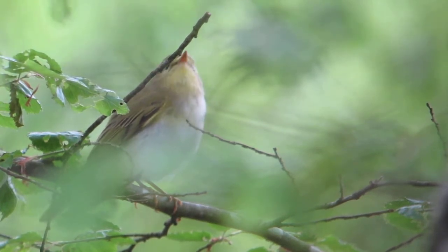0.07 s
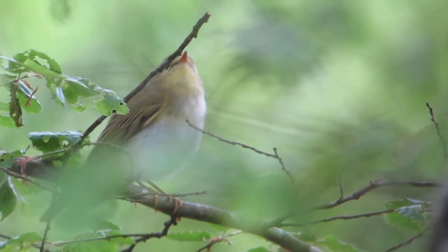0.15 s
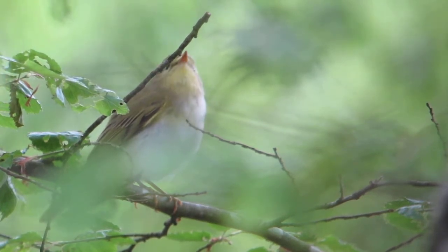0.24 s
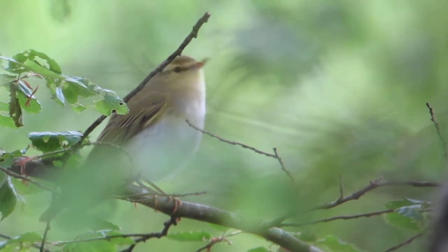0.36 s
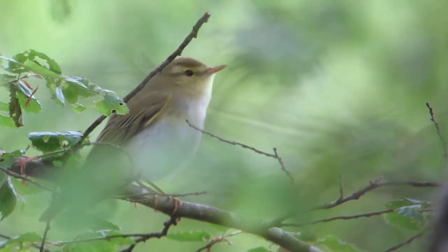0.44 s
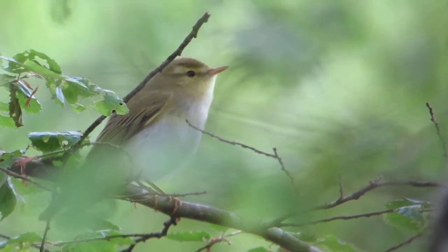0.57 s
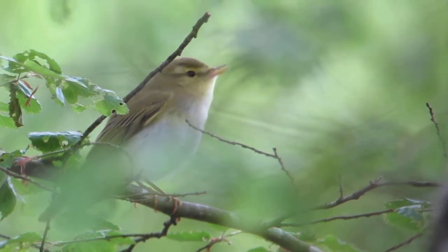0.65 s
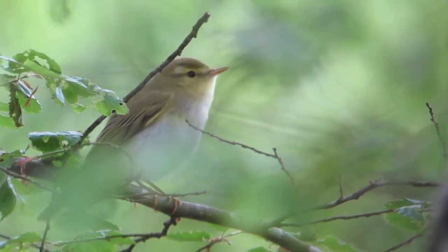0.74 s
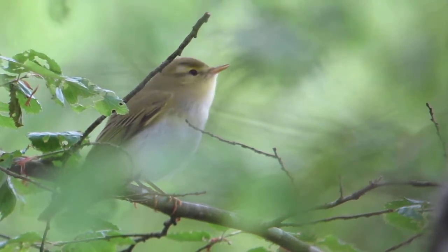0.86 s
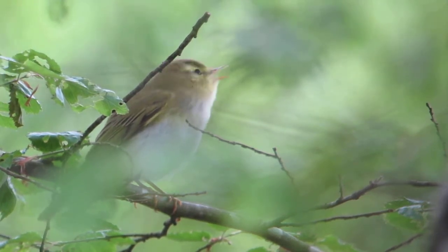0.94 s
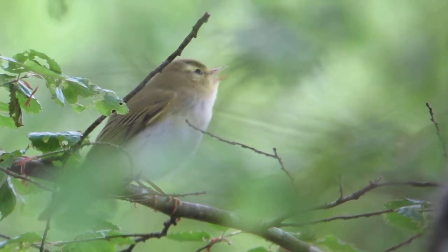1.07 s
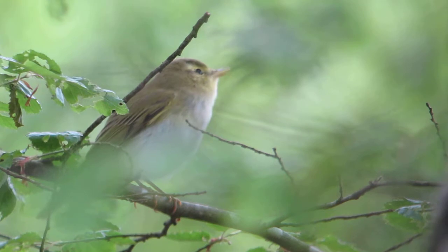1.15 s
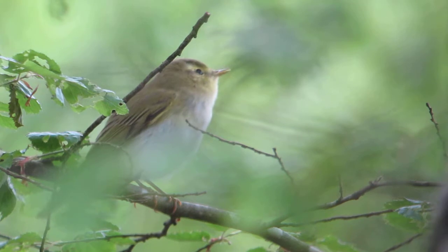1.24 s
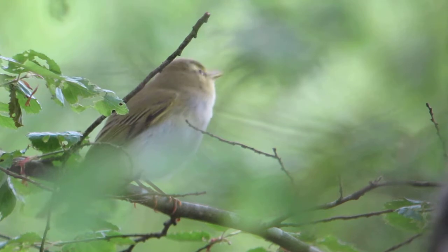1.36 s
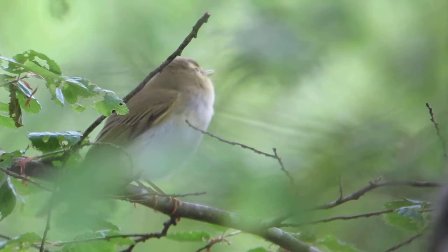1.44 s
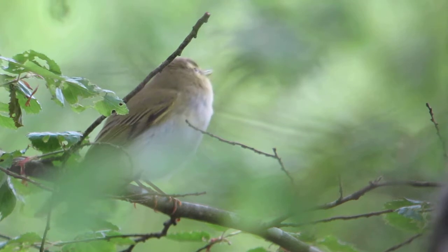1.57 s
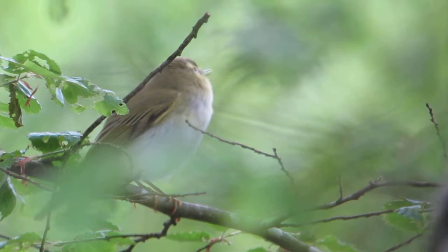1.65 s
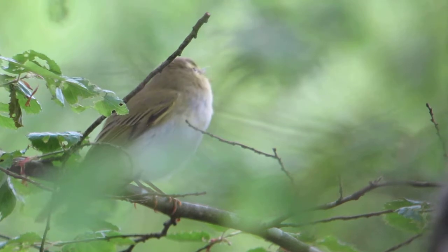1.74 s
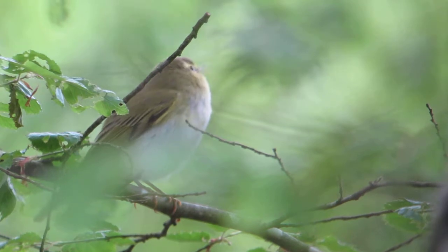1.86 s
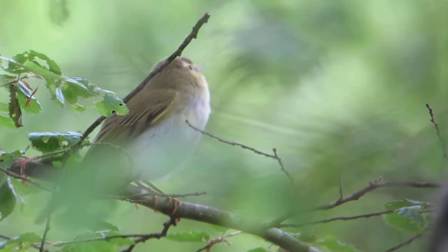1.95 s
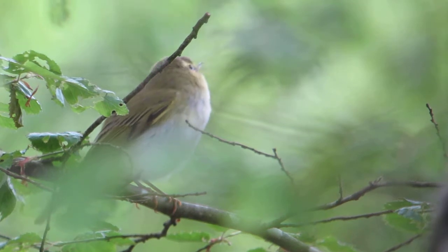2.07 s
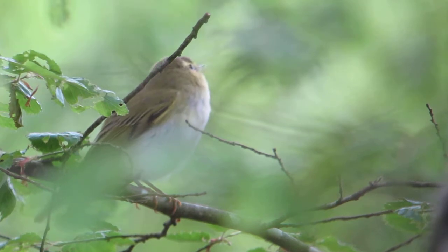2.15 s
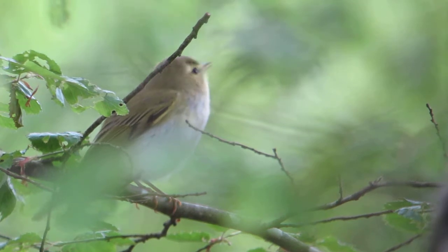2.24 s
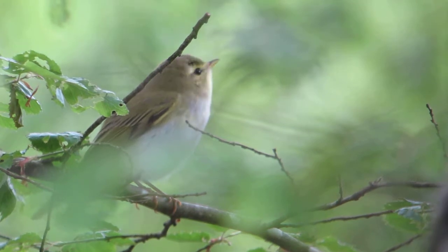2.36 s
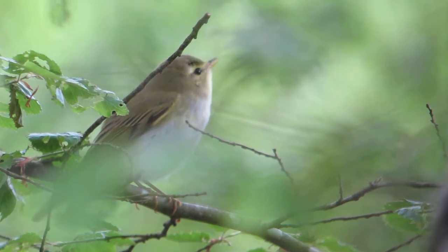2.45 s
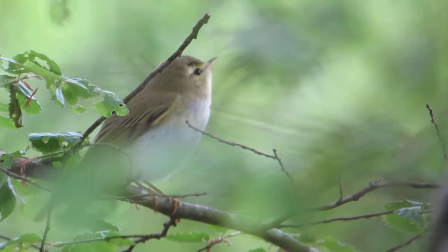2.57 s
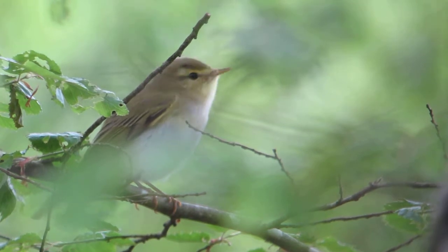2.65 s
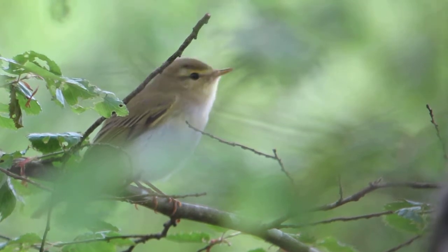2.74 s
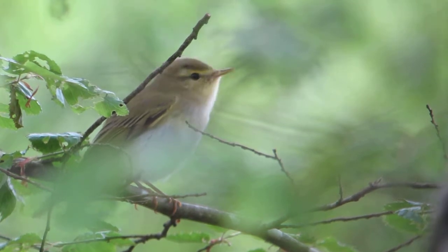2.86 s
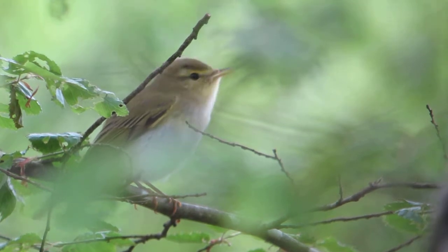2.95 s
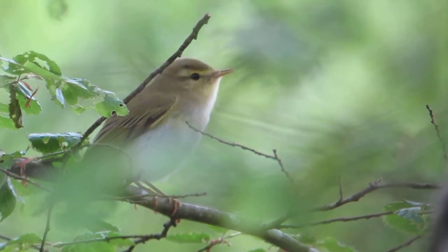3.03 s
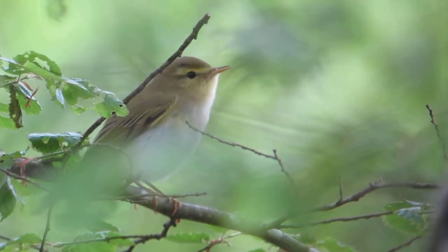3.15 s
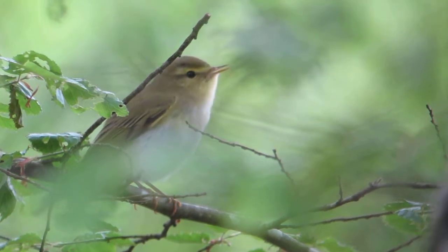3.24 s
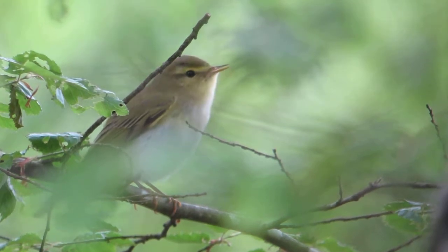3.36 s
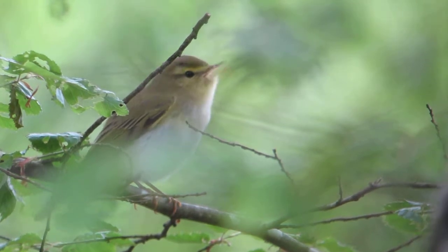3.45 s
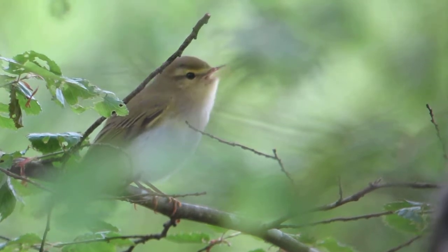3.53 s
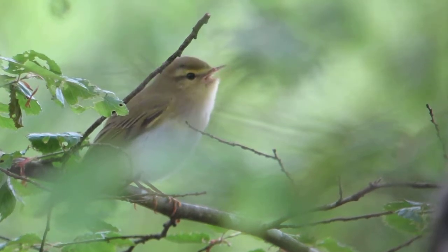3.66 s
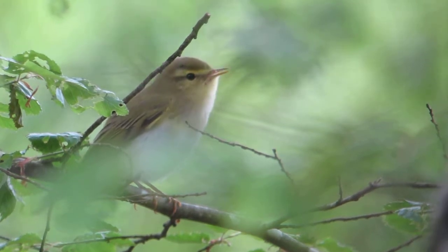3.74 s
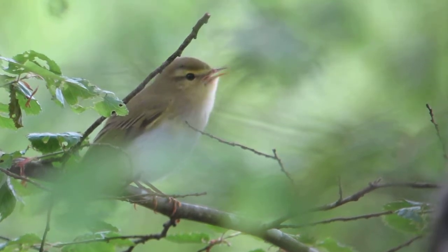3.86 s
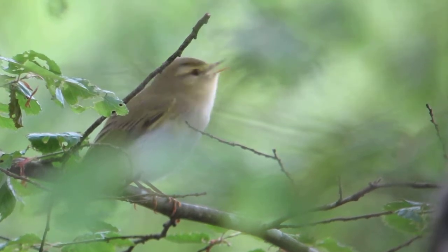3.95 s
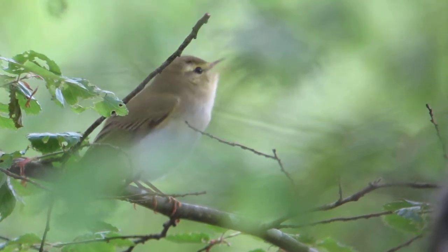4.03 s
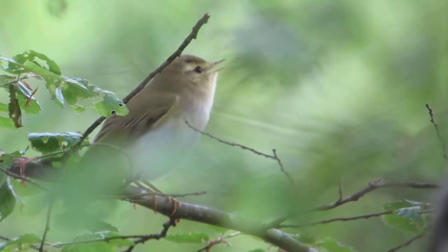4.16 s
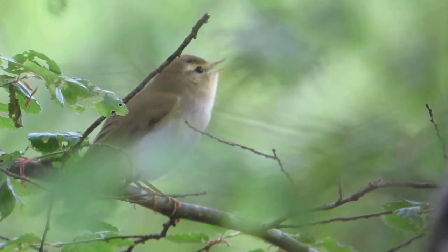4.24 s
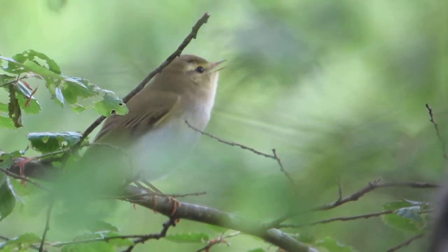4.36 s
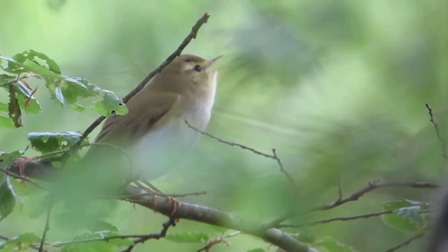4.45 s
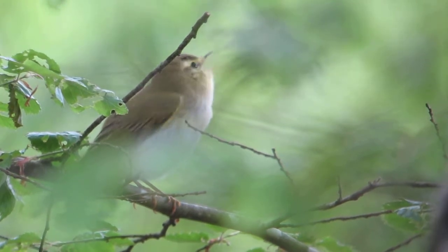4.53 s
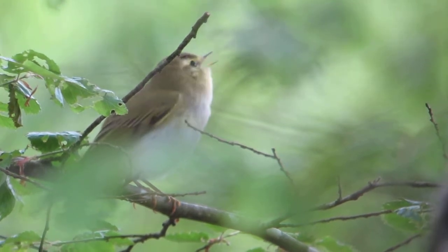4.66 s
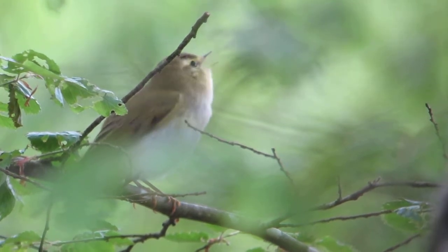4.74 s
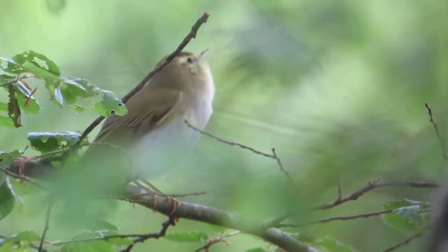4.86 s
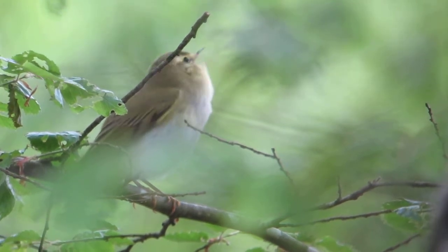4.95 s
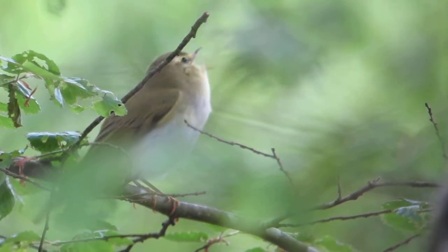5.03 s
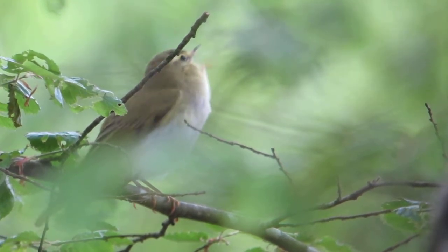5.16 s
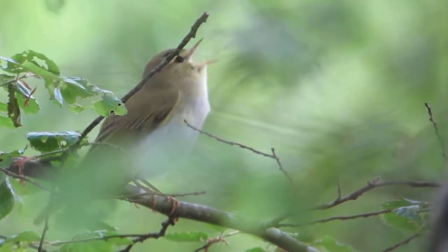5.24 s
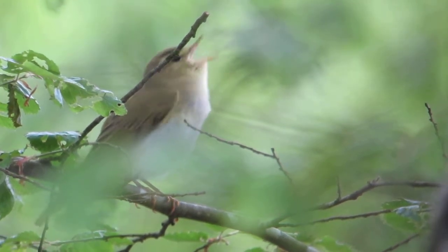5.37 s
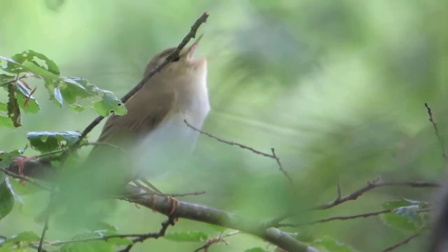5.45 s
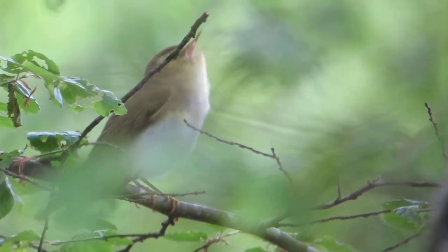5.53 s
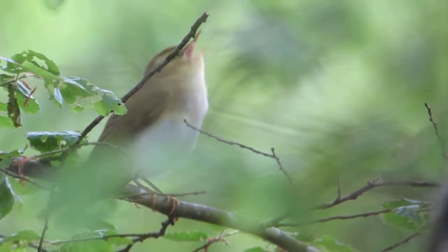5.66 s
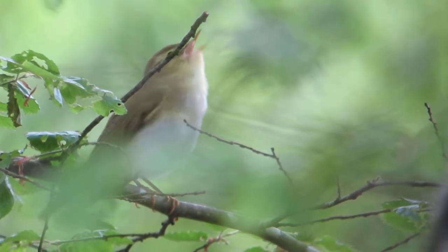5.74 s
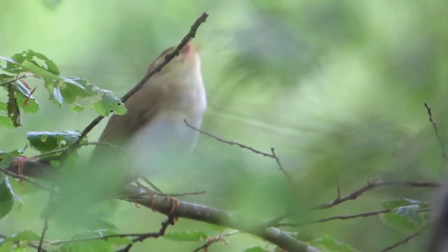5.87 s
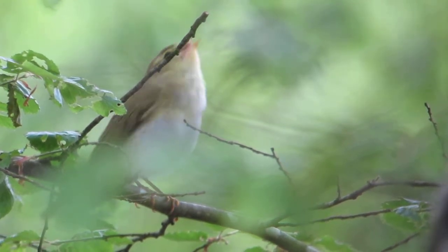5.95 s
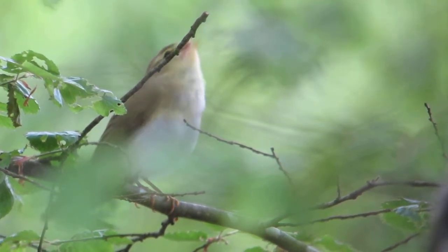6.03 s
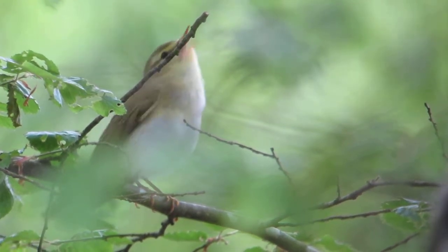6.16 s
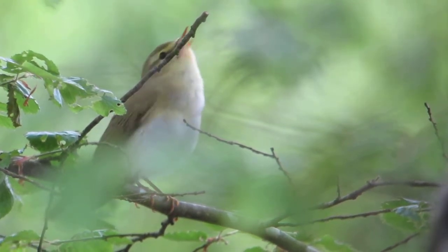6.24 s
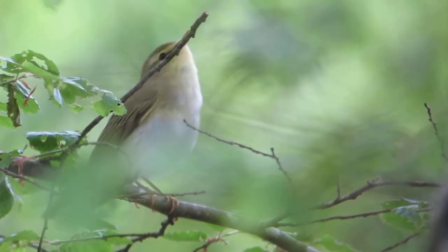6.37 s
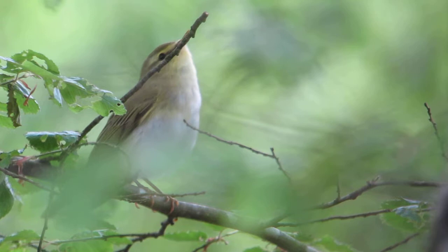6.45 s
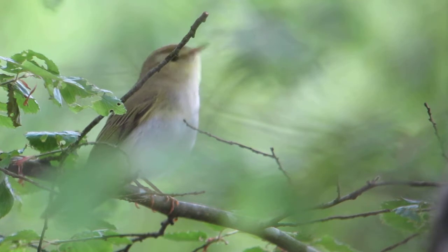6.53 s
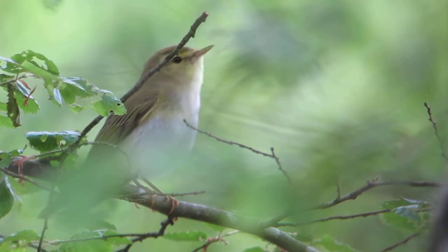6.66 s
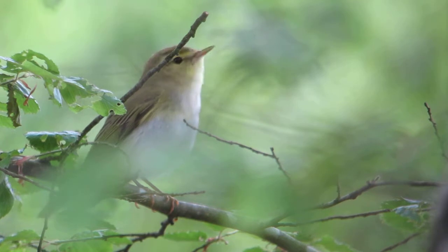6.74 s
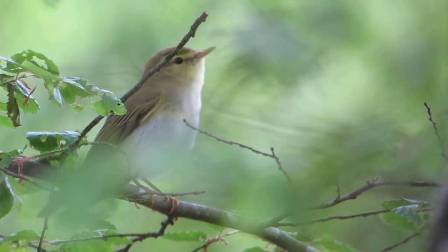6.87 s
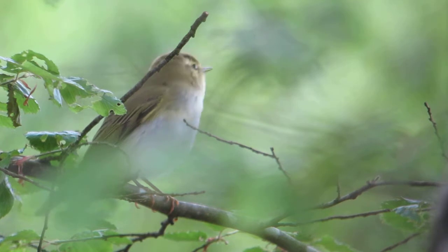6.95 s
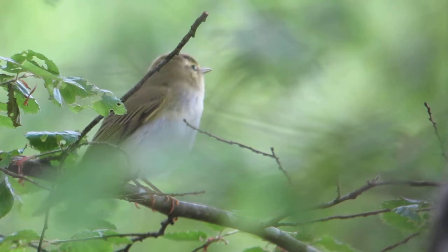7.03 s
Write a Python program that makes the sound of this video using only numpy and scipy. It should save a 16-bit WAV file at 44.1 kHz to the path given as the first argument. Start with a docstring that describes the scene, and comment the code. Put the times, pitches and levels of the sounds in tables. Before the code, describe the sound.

A small warbler sings close to a stereo microphone in a leafy wood, over soft steady air and a thin, faint high whine. At about 0.7 seconds it begins quiet, high ticks, roughly eight a second, which gradually swell. Around 3.5 seconds they become fuller, sharper notes, each sweeping upward, coming slightly faster. At 5 seconds they run into a rapid trill, the loudest sound, peaking near 6 seconds and ending at about 6.3 with a short ring among the trees.

Farther off, a bird slightly to the left whistles three falling pairs between 1.6 and 3.3 seconds. Another gives soft falling slurs from 3.5 to 5.2 seconds. A faint low rumble rises a little around 4 seconds. A few distant raspy chirps and tiny clicks are scattered through. From 6.4 to 7 seconds a faint, even run of falling notes comes from deep in the wood.

```python
"""A wood warbler close to a stereo microphone in a leafy wood: soft ticks grow into 'sip' notes and run
into a fast, loud trill, each note an upward sweep of the syrinx thrown back by trunks and leaves.
A few trees away a second bird slurs; farther off one whistles three falling pairs and others chirp.
Under it lie woodland air, a low rumble, a few hissy far-off calls, tiny clicks and a thin whine."""
import sys
import numpy as np
from scipy import signal
from scipy.fft import rfft, irfft
from scipy.io import wavfile
from scipy.ndimage import uniform_filter1d

SR = 44100
rng = np.random.default_rng(int(sys.argv[2]) if len(sys.argv) > 2 else 0)


def transcribe(signal):
    """Save signal, clipped to [-1, 1], as a 16-bit WAV file at the path in sys.argv[1]."""
    frames = np.atleast_2d(signal).T
    limited = np.clip(frames, -1, 1)
    pcm = np.round(limited * 32767).astype(np.int16)
    wavfile.write(sys.argv[1], SR, pcm)


N = 313110


def amp(db):
    """Decibels to gain."""
    return 10 ** (np.asarray(db) / 20)


def unit(x):
    """Scales to rms 1."""
    return x / np.sqrt(np.mean(x ** 2) + 1e-20)


def read(points, hz):
    """Reads a spectrum on a log-frequency axis."""
    f, value = np.transpose(points)
    return np.interp(np.log(hz + 1), np.log(f + 1), value)


def follow(rows, s):
    """Reads every column of a curve at the times s."""
    times, *columns = np.transpose(rows)
    return [np.interp(s, times, c) for c in columns]


def add(mix, s, sound):
    """Mixes a sound in at time s."""
    part = mix[..., max(round(s * SR), 0):][..., :sound.shape[-1]]
    part += sound[..., :part.shape[-1]]


def noise(gain, likeness):
    """Stereo noise of rms 1 with the given spectral shape and left-right likeness."""
    a, b = rfft(rng.standard_normal((2, N)))
    same = np.clip(likeness, -1, 1)
    return unit(irfft(np.array([a, same * a + np.sqrt(1 - same ** 2) * b]) * gain, N))


def wander(size, seconds):
    """A random drift of about unit size that changes over the given time."""
    knots = rng.standard_normal(512)
    return np.interp(np.arange(size) / SR / seconds, np.arange(len(knots)), knots)


def phase_of(hz):
    """Phase of a gliding tone."""
    return 2 * np.pi * np.cumsum(hz) / SR


def slur(db, first_hz, last_hz, length_s, waver=0.012):
    """A short, slightly unsteady glide."""
    size = int(length_s * SR)
    pitch = np.linspace(first_hz, last_hz, size) * (1 + waver * wander(size, 0.00367))
    return amp(db) * np.sin(phase_of(pitch)) * signal.windows.tukey(size, .6)


def woodland_air(level_db=-52.5):
    """The bed of the place: a wide, nearly steady wash of air."""
    # colour of the air: (frequency [Hz], relative density [dB])
    spectrum = [(20, -6.5), (45, -3.5), (70, -2), (120, -1.5), (180, 0.5), (300, -2.5), (600, -2.5),
                (1000, -5), (1600, -8.5), (2100, -6), (3100, -6.5), (3900, -11.5), (6500, -18.5),
                (15500, -22.5)]
    # how alike the two channels are: (frequency [Hz], correlation [0..1])
    likeness = [(30, 0.55), (90, 0.59), (180, 0.48), (400, 0.43), (1500, 0.27), (5000, 0.019),
                (15000, 0.35)]
    hz = np.fft.rfftfreq(N, 1 / SR)
    return amp(level_db + 0.3 * wander(N, 0.352)) * noise(amp(read(spectrum, hz)), read(likeness, hz))


def rumble(up_s=3.45, rise_s=0.68, before_db=-69, after_db=-60, centre_hz=66, width_hz=15):
    """A low, uneven rumble in the middle of the stereo image that steps up once."""
    hz = np.fft.rfftfreq(N, 1 / SR)
    level_db = np.interp(np.arange(N) / SR, [up_s, up_s + rise_s], [before_db, after_db])
    band = np.exp(-.5 * ((hz - centre_hz) / width_hz) ** 2)
    return amp(level_db + 1.1 * wander(N, 0.11)) * noise(band, likeness=0.96)


def whine(level_db=-50.5):
    """A thin steady band of noise near 5 kHz, with three fainter narrow lines."""
    # shape of the band: (frequency [Hz], relative density [dB])
    spectrum = [(4100, -69), (4400, -13.5), (4600, 2.5), (4780, -1), (4920, 6.5), (5080, -4), (5300, -13),
                (5800, -20)]
    # narrow lines: (centre [Hz], half-width [Hz], level [dB])
    lines = [(4770, 31, -63), (8820, 34, -70.5), (12500, 120, -75.5)]
    hz = np.fft.rfftfreq(N, 1 / SR)
    band = amp(read(spectrum, hz)) * (abs(hz - 5000) < 1000)
    out = amp(level_db) * noise(band, likeness=0.033)
    for centre_hz, width_hz, db in lines:
        out += amp(db) * noise(1 / (1 + ((hz - centre_hz) / width_hz) ** 4), likeness=0.15)
    return out


def far_calls_and_clicks():
    """Soft hissy bursts of far-off bird calls, one brief high hiss and tiny dry clicks, all band noise."""
    # far-off calls and the high hiss: (time [s], level [dB], centre [Hz], width [octaves], length [s])
    calls = [(.62, -49.5, 2560, 0.44, 0.065), (.935, -49.5, 1900, 0.72, 0.036), (.94, -53, 5400, .2, .035),
             (1.39, -49, 2840, 0.54, 0.063), (2.67, -49.5, 2520, 0.64, 0.028),
             (3.065, -54, 11700, 0.2, 0.057), (6.74, -50.5, 2450, 0.37, 0.076)]
    # clicks: (time [s], level [dB], centre [Hz], width [octaves], length [s])
    clicks = [(.698, -54, 12500, .3, 0.0043), (1.695, -47, 12100, .3, .005),
              (6.941, -48, 9900, 0.64, 0.0042)]
    out = np.zeros((2, N))
    hz = np.fft.rfftfreq(SR, 1 / SR) + 1
    for s, db, centre_hz, octaves, length_s in calls + clicks:
        band = np.exp(-.5 * (np.log2(hz / centre_hz) / octaves) ** 2)
        burst = unit(irfft(rfft(rng.standard_normal((2, SR))) * band))[:, :int(length_s * SR)]
        add(out, s, amp(db) * burst * signal.windows.tukey(burst.shape[1], .7))
    return out


def foliage(song, near_db, far_db, near_t60_s=0.069, near_rise_s=.007, far_rise_s=0.012):
    """Scatter from the leaves close by dies fast; the deeper wood rings on."""
    # ring of the deeper wood: (frequency [Hz], time to fall 60 dB [s])
    decay = [(2000, 0.74), (4500, 0.6), (6000, 0.43), (7500, 0.5), (14000, 0.45)]
    # the beak beams its sound, so it reaches the trees unevenly: (frequency [Hz], gain [dB])
    scatter = [(2500, -2), (4500, 0), (6200, 6.5), (7400, 0), (9000, 3.5), (14000, 5.5)]
    hz, frame_s, spectra = signal.stft(rng.standard_normal((2, SR)), SR, nperseg=256)
    fade = amp(-60 * frame_s / read(decay, hz)[:, None])
    deep = signal.istft(spectra * fade, SR, nperseg=256)[1][:, :SR]
    t = np.arange(SR) / SR
    deep = unit(deep * (1 - np.exp(-t / far_rise_s)))
    leaves = rng.standard_normal((2, SR)) * (rng.random((2, SR)) < 2000 / SR)  # 2000 echoes a second
    near = unit(leaves * amp(-60 * t / near_t60_s) * (1 - np.exp(-t / near_rise_s)))
    tail = (amp(near_db) * near + amp(far_db) * deep) / np.sqrt(SR)
    spread = irfft(rfft(song) * amp(read(scatter, np.fft.rfftfreq(N, 1 / SR))), N)
    return signal.fftconvolve(spread[None], tail, axes=1)[:, :N]


def far_birds(chip_db=-1, run_start_s=6.42, run_step_s=.0815, run_notes=8):
    """A few raspy chips and one even run of falling notes from deep in the wood."""
    # thin chips: (time [s], relative level [dB])
    chips = [(.631, -57), (1.391, -55), (2.653, -55)]
    # a chip's two parts: (delay [s], relative level [dB], first pitch [Hz], last pitch [Hz], length [s])
    parts = [(0, 1, 5470, 5360, 0.025), (.017, 1, 3290, 2870, 0.0284)]
    song = np.zeros(N)
    for s, db in chips:
        for delay, *part in parts:
            add(song, s + delay, amp(db + chip_db) * slur(*part, waver=0.021))
    for k in range(run_notes):
        falling = slur(db=-59, first_hz=3400, last_hz=2650, length_s=.03, waver=.05)
        add(song, run_start_s + k * run_step_s, falling)
    return song


def whistler(droop_delay_s=.088, droop_db=-2.5, droop_fall=0.077):
    """A far bird's paired whistles, nearly pure tones; the first of each pair droops away."""
    # one whistle, a quick drop to a held pitch: (time [s], pitch [x held pitch], relative level [dB])
    shape = [(0, 1.42, -19), (.011, 1.29, -4.5), (.026, 1.07, 2), (.035, 1.005, 2), (0.061, 1, 1),
             (.084, 1, 4.5), (0.099, 0.9, -25)]
    # pairs: (time [s], delay of the second [s], level [dB], first pitch [Hz], second pitch [Hz])
    pairs = [(1.582, .21, -47.5, 2598, 2455), (2.186, .224, -47, 2460, 2440),
             (2.903, .241, -47.5, 2417, 2410)]
    song = np.zeros(N)
    t = np.arange(0, shape[-1][0], 1 / SR)
    factor, swell_db = follow(shape, t)
    for start, gap, db, first_hz, second_hz in pairs:
        for s, hz in (start, first_hz), (start + gap, second_hz):
            pitch = hz * factor * (1 + 0.0029 * wander(len(t), 0.014))
            call = amp(db + swell_db) * np.sin(phase_of(pitch)) * signal.windows.tukey(len(t), .1)
            add(song, s, call)
        droop = slur(db + droop_db, first_hz, first_hz * (1 - droop_fall), length_s=0.067)
        add(song, start + droop_delay_s, droop)
    return song


def neighbour(fall=.25):
    """A second bird's soft falling slurs, a few trees away."""
    # slurs: (time [s], level [dB], first pitch [Hz])
    slurs = [(3.505, -56, 3700), (3.634, -56, 3550), (3.759, -57, 3700), (3.9, -54, 3600),
             (4.123, -57, 2975), (4.415, -51, 3000), (4.565, -56, 3100), (4.639, -55, 3200),
             (4.731, -53, 3150), (4.818, -52.5, 3150), (4.898, -51.5, 3140), (5.157, -54, 2950)]
    song = np.zeros(N)
    for s, db, hz in slurs:
        add(song, s, slur(db, hz, hz * (1 - fall), length_s=.033))
    return song


def perch(song, left_lag_s=.000023):
    """The straight path from beak to microphone, and single echoes off the nearest trunks."""
    # the head turns while singing: (time [s], left minus right [dB])
    facing = [(.5, -1), (3, -1.5), (4.8, -0.5), (5.2, 0.5), (5.7, 3), (6.3, 4)]
    # echoes off trunks and boughs: (delay [s], left gain [dB], right gain [dB])
    trunks = [(.0062, -12, -13), (.0105, -14, -12.5), (.0135, -17, -17), (.029, -16, -17)]
    lean_db, = follow(facing, np.arange(N) / SR)
    left = irfft(rfft(song) * np.exp(-2j * np.pi * np.fft.rfftfreq(N, 1 / SR) * left_lag_s), N)
    out = np.array([left, song]) * amp(np.array([lean_db, -lean_db]) / 2)
    for delay, *gains_db in trunks:
        for channel, db in zip(out, gains_db):
            add(channel, delay + rng.uniform(-.0001, .0001), amp(db) * song)
    return out


def high_pip(form, db, length_s=0.025):
    """A faint high pip with each tick and sip, sinking from about 11 to 8.5 kHz: (delay, sound)."""
    # from tick to sip: (blend [0..1], pitch [Hz], scoop [share of pitch], delay [s])
    ends = [(0, 11200, -0.36, .003), (1, 8470, 0.145, .012)]
    hz, scoop, delay = follow(ends, form ** 2.2)  # the pip changes later than the note
    t = np.arange(0, length_s, 1 / SR)
    glide = 1 + scoop * np.exp(-t / 0.00475) + 0.024 * wander(len(t), 0.00177)
    return delay, amp(db) * np.sin(phase_of(hz * glide)) * signal.windows.tukey(len(t), .7)


def warbler_note(form, stretch=1, low_db=0, waver=0.0054, flutter_db=3.0):
    """One upward sweep of the syrinx, blending forms 0 tick, 1 sip, 2 trill: (start offset, sound)."""
    # the three forms: (time from the note's middle [s], pitch [Hz], relative level [dB])
    tick_form = [(-.02, 2123, -13), (-.012, 2580, -5.5), (-.006, 3516, -12), (-.002, 5070, -7.5),
                 (.002, 6300, -13.5), (.007, 7340, -2.5), (.012, 8050, -6), (.018, 8440, 3.5),
                 (.022, 8300, -32)]
    sip_form = [(-.021, 2150, -35), (-.014, 2426, -12), (-.005, 3520, -10.5), (-.001, 4860, -7),
                (.005, 5730, -3.5), (.0095, 6920, -1), (0.017, 7380, 2.5), (0.021, 7600, 2),
                (.026, 7600, -47)]
    trill_form = [(-.018, 3570, -48), (-.013, 3750, -23), (-.0075, 3967, -22), (-.005, 4543, -4),
                  (.005, 5420, -2.5), (.012, 6250, -3), (0.0204, 7450, -6), (.0259, 6520, -15),
                  (.032, 6150, -33)]
    # base strength of the second harmonic: (pitch [Hz], relative level [dB])
    octave_curve = [(3500, -28), (4500, -40), (5500, -42), (6200, -37), (6800, -29.5), (7600, -33)]
    shares = np.maximum(1 - abs(np.clip(form, 0, 2) - np.arange(3)), 0)
    tick_share, _, trill_share = shares
    shape = np.tensordot(shares, np.array([tick_form, sip_form, trill_form]), 1) * [stretch, 1, 1]
    t = np.arange(shape[0, 0], shape[-1, 0], 1 / SR)
    hz, db = (uniform_filter1d(c, size=70) for c in follow(shape, t))
    phase = phase_of(hz * (1 + waver * wander(len(t), 0.00193)))
    # the low start of a tick or sip is reedy, with a stronger octave and a third harmonic
    low = np.clip((6200 - hz) / 1500, 0, 1)
    reedy = low * (1 - trill_share)
    octave = amp(read(octave_curve, hz) + 5 * tick_share) + reedy * amp(-16)
    tone = np.sin(phase) + octave * np.sin(2 * phase) + reedy * amp(-22) * np.sin(3 * phase)
    envelope = amp(db + low * low_db + flutter_db * wander(len(t), 0.002105))
    return t[0], tone * envelope * signal.windows.tukey(len(t), .1)


def warbler_lead_in(voice_db=2, swell_s=1.3):
    """Ticks swell and ripen into sips, each with a faint high pip above it."""
    # opening ticks, at a loose pace: (time [s])
    tick_times = [0.73, .8734, .9968, 1.122, 1.2374, 1.3488, 1.457, 1.5664, 1.679, 1.793, 1.9027, 2.0167,
                  2.132, 2.239, 2.349, 2.4914, 2.644, 2.8347, 2.984, 3.1428, 3.2735, 3.3833]
    # the sips that follow: (time [s], relative level [dB])
    sips = [(3.4874, -36.5), (3.6048, -36), (3.728, -33), (3.8482, -33), (3.9597, -32.5), (4.0629, -33.5),
            (4.165, -33), (4.2665, -33), (4.365, -33.5), (4.4694, -31.5), (4.57, -32.5), (4.673, -31.5),
            (4.769, -32.5), (4.868, -31)]
    # ticks turn into sips: (time [s], form [0 tick, 1 sip])
    ripening = [(2.4, 0.064), (3.3, 0.23), (3.55, .8), (3.95, 1)]
    # strength of the high pip: (time [s], level [dB])
    pip_level = [(.7, -62), (.9, -56), (3.3, -57), (3.75, -47), (4.05, -45), (4.9, -52.5)]
    song = np.zeros(N)
    # the ticks start 21 dB under the level they swell toward
    ticks = [(s, -37.5 - 21 * np.exp((tick_times[0] - s) / swell_s)) for s in tick_times]
    for s, db in ticks + sips:
        form, = follow(ripening, s)
        offset, sound = warbler_note(form)
        add(song, s + offset, amp(db + voice_db) * sound)
        delay, pip = high_pip(form, *follow(pip_level, s))
        add(song, s + delay, pip)
    return song


def warbler_trill(start_s=4.9523, step_s=.06619, drag_s=.0457, notes=21, voice_db=1.5):
    """Fast notes that grow louder, fill out at their low start and slow a little toward the end."""
    # the crescendo: (time [s], relative level [dB])
    effort = [(4.95, -28), (5.16, -26.5), (5.36, -23.5), (5.58, -22), (6.0, -21.5), (6.32, -24)]
    song = np.zeros(N)
    for k, progress in enumerate(np.linspace(0, 1, notes)):
        s = start_s + k * step_s + drag_s * progress ** 3
        db, = follow(effort, s)
        offset, sound = warbler_note(form=2, stretch=.94 + .1 * progress, low_db=1 - 6.5 * np.exp(-k / 5))
        add(song, s + offset, amp(db + voice_db) * sound)
    return song


def scene(whistler_lean_db=3):
    """The warbler close by, the other birds farther among the trees, the whistler to the left."""
    song = warbler_lead_in() + warbler_trill()
    slurs, whistles, chirps = neighbour(), whistler(), far_birds()
    close = perch(song) + foliage(song, near_db=-7, far_db=-4.5)
    nearby = slurs + foliage(slurs, near_db=1, far_db=-6)
    lean_left = amp(np.array([[1], [-1]]) * whistler_lean_db / 2)
    midway = (whistles + foliage(whistles, near_db=.5, far_db=1)) * lean_left
    distant = chirps + foliage(chirps, near_db=3, far_db=2)
    return close + nearby + midway + distant + far_calls_and_clicks() + woodland_air() + rumble() + whine()


def record(dry, notch_hz=8270, notch_half_width_hz=330, edge_hz=15800):
    """The camera's microphone channels have a narrow notch in the treble and a steep band limit."""
    hz = np.fft.rfftfreq(N, 1 / SR)
    offset = ((hz - notch_hz) / notch_half_width_hz) ** 2
    notched = irfft(rfft(dry) * offset / (1 + offset), N)
    lowpass = signal.firwin(511, edge_hz, window=("kaiser", 9), fs=SR)
    return signal.oaconvolve(notched, lowpass[None], "same")


dry = scene()
out = record(dry)
transcribe(out)
```